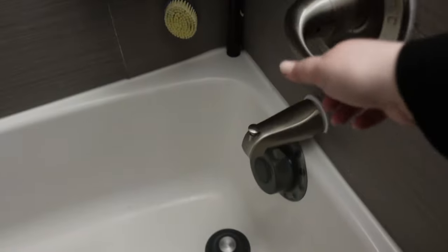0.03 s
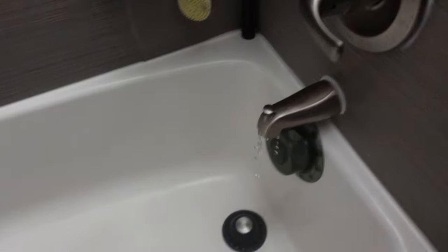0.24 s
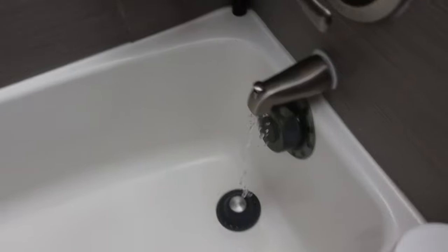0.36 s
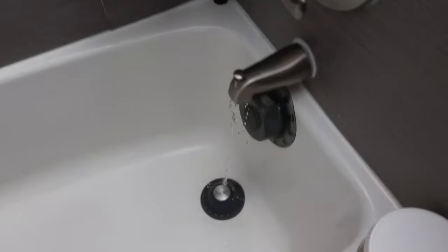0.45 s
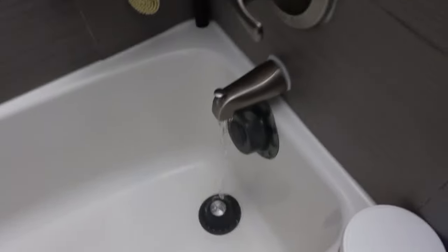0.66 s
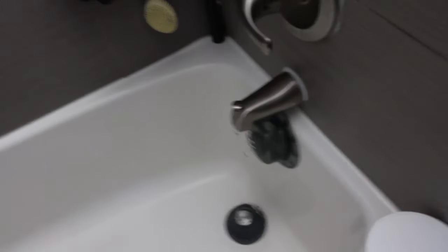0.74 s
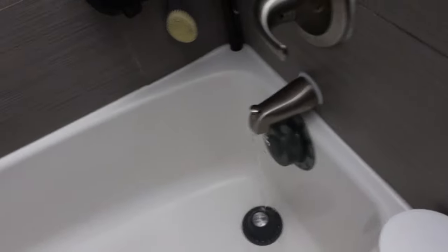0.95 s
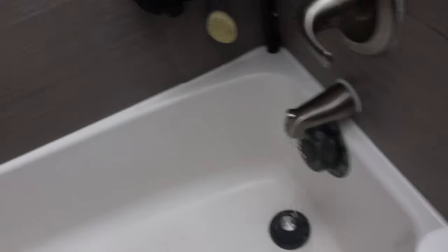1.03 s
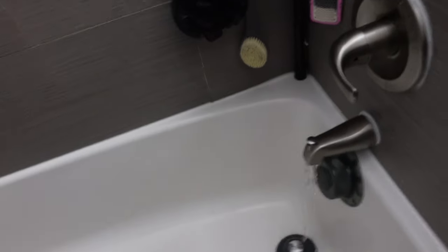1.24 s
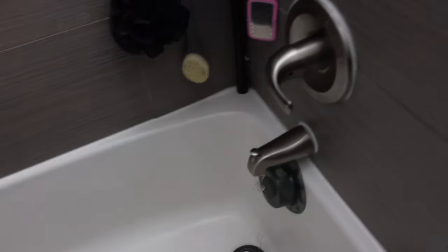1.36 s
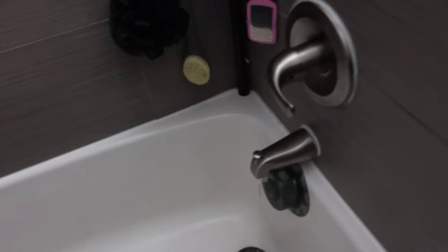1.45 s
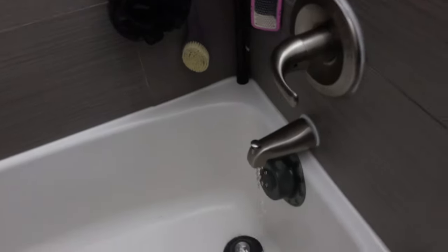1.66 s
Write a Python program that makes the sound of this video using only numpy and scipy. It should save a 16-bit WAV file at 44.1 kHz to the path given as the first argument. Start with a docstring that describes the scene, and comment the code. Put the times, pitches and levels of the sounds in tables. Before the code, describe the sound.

Water from a just-opened bath tap: faint handle clinks and pipe murmur, then a thin stream spattering on an empty tub, low handling thumps, a hard knock and sharp click; small tiled bathroom, close handheld microphone.

```python
"""Bath tap opening

A bath tap has just been opened: filtered noise murmurs in the pipe, the handle clinks as struck modes, and
a thin stream of droplet clicks, bubble pings and spray spatters on the empty tub, ringing and humming its
shell in a small tiled bathroom. The hand-held microphone sways as low noise and is bumped with low thumps.
Later come a hard knock and a sharp click close by, both shaped bursts, each with a dull jolt of low modes.
"""
import sys
import numpy as np
from scipy import signal
from scipy.fft import rfft, irfft
from scipy.io import wavfile
from scipy.ndimage import uniform_filter1d

SR = 44100
rng = np.random.default_rng(int(sys.argv[2]) if len(sys.argv) > 2 else 0)


def dump_mix(stems):
    """Bounce the given channels to the path in sys.argv[1] as a 16-bit WAV at rate SR."""
    frames = np.atleast_2d(stems).T  # one column per channel
    limited = np.clip(frames, -1, 1)  # hard clip at full scale
    pcm = np.round(limited * 32767).astype(np.int16)
    wavfile.write(sys.argv[1], SR, pcm)


N = 74970
T = np.arange(N) / SR

# All levels are relative: later gains and filters shape them further.
# Murmur of water in the pipe and spout: [f/Hz, level/dB]
PIPE_COLOUR = [(60, 4), (130, -13), (230, 3.5), (370, -3.5), (650, -2), (1000, 0), (1250, -9),
               (1550, -18.5), (2200, -17), (2900, -24.5), (4200, -22.5), (8500, -29.5), (11000, -42),
               (16000, -45)]
PIPE_DB, PIPE_WAVER_DB = -48, 1
# Gulps in the spout: [t/s, level/dB, centre f/Hz]
GULPS = [(.002, -35, 750), (0.191, -37.5, 754), (.25, -36, 740), (0.345, -34.5, 740), (0.454, -35, 1010),
         (.495, -37, 715), (0.601, -31.5, 750), (0.632, -29, 835), (0.676, -32.5, 660), (0.699, -30.5, 650),
         (0.944, -32, 970), (1.105, -30.5, 680)]
GULP_Q, GULP_DECAY_S = 2.8, 0.0067

# Sway of the microphone: [t/s, level/dB]
SWAY_LEVEL = [(0, -36), (.15, -26.5), (.24, -20.5), (.40, -24), (.62, -4), (.86, -14.5), (.97, -18),
              (1.10, -29), (1.25, -11.5), (1.45, -19.5), (1.55, -29.5), (1.7, -36)]
# Colour of the sway: [f/Hz, level/dB]
SWAY_COLOUR = [(5, -5.5), (14, -1.5), (22, -4), (35, -16), (55, -33), (90, -45), (200, -59.5), (600, -79.5)]
# Bumps on the microphone's body: [t/s, rocking level/dB, rocking f/Hz, rub level/dB]
THUMPS = [(.455, -18, 38.7, -25.5), (.478, 1, 26.1, -40), (.527, -17, 15, -28), (0.548, 0.5, 33.8, -22),
          (0.596, -5.5, 41.8, -19.5), (0.637, -2.5, 25.9, -22.5), (0.674, -7.5, 16.8, -30),
          (1.186, 2.5, 19.8, -13), (1.319, -6.5, 15.2, -20.5)]
THUMP_RISE_S, THUMP_DECAY_S, RUB_DECAY_S = 0.005, 0.06, 0.021
# Colour of the rub on the case: [f/Hz, level/dB]
RUB_COLOUR = [(20, -22.5), (65, 1), (100, -7), (200, -12.5), (300, -21.5), (600, -43.5), (2000, -84)]
RUMBLE_CEILING = 0.8  # amplitude where the handling noise saturates

# Water landing in the tub: [t/s, level/dB]
FLOW_LEVEL = [(0, -64.5), (.42, -82), (.44, -47.5), (.51, -50), (.55, -43), (.67, -38.5), (.80, -49),
              (.83, -31.5), (.90, -43), (1.0, -36), (1.09, -50), (1.18, -46), (1.30, -42), (1.45, -43.5),
              (1.485, -45.5), (1.535, -38), (1.62, -42), (1.65, -38)]
# Colour of the spatter: [f/Hz, level/dB]
SPATTER_COLOUR = [(150, -63), (400, -48), (700, 2), (1200, 5.5), (1450, -5), (1750, 1.5), (2600, -7.5),
                  (3200, -3.5), (5300, -0.5), (6800, -2.5), (8600, 2), (10500, -3), (12800, 1.5),
                  (16000, -6.5)]
DROPS_PER_S, DROP_SPREAD_DB, SPRAY_DB = 2600, 1.5, -7.5
SURGE_DB, SPATTER_DB = 4, -0.5
# Bubble pings: starting pitch range, decay in cycles, and pitch rise as a share of that pitch
PINGS_PER_S, PING_LOW_HZ, PING_HIGH_HZ = 480, 1483, 14300
PING_CYCLES, PING_RISE, PING_SPREAD_DB, PING_DB = 4.9, 0.14, 5.5, -1
# Ringing modes of the tub shell: [f/Hz, level/dB, t60/s]
TUB_MODES = [(161.8, -4.5, 0.34), (204, -4.5, 0.2), (626, -9.5, 0.6), (680, 2.5, 0.16), (815, -7, 0.27),
             (848, -7, 0.11), (961, -6, 0.39), (1020, -12.5, 0.16), (1115, 1.5, 0.2), (1213, 0.5, 0.24),
             (1281, -0.5, 0.23), (1596, 2, 0.17)]
TUB_DB = -49
TUB_SPLASH_SHARE = 0.63  # exponent: how closely the drumming follows the flow
# Low hum of the tub under the stream: [t/s, level/dB]
HUM_LEVEL = [(0, -74), (.32, -69), (.38, -52), (.62, -40.5), (.76, -55), (.84, -40), (.92, -54.5),
             (1.03, -40), (1.11, -64), (1.28, -43.5), (1.42, -54.5), (1.53, -57), (1.60, -47.5),
             (1.68, -54.5)]
HUM_HZ, HUM_WANDER_HZ = 205.6, 7.6

# Clinks of the handle: [t/s, level/dB, f/Hz, t60/s]
CLINKS = [(.038, -35.5, 1200, 0.045), (0.041, -48, 1520, 0.15), (0.052, -46.5, 2050, .07),
          (0.088, -29.5, 1036, .12), (.112, -50, 1850, 0.089)]
CLINK_ROUGH_DB, CLINK_ROOM_DB = 4, -5

# Big drops slapping the tub: [t/s, level/dB, centre f/Hz, decay/s]
SPLATS = [(.4373, -35, 2540, 0.004), (.5221, -25, 7400, 0.0016), (0.527, -33.5, 3540, 0.0044),
          (.5535, -27.5, 8500, 0.0017), (.592, -26, 7400, 0.0014), (.599, -31.5, 2900, 0.0053),
          (0.61, -39, 3600, 0.0022), (0.627, -32.5, 1800, 0.0032), (0.631, -41, 12100, 0.00071),
          (0.6594, -32.5, 6750, .003), (.666, -28, 4130, 0.003), (.71, -23.5, 4300, 0.00091),
          (.7595, -20.5, 5160, 0.0019), (.8139, -23, 6850, 0.0041), (.815, -25.5, 2220, 0.0036),
          (0.8462, -12, 4830, .0012), (.862, -26, 7050, 0.0034), (.9178, -12, 5800, 0.00089),
          (.9258, -13.5, 5430, 0.0009), (.9525, -16, 12200, 0.00081), (.9795, -32, 1890, 0.0033),
          (1.0033, -14.5, 8800, 0.00084), (1.004, -23.5, 3300, 0.0024), (1.0335, -23.5, 8500, .0007),
          (1.0595, -20, 4260, 0.00086), (1.094, -18.5, 8500, 0.00085), (1.097, -34.5, 2140, 0.0092),
          (1.11, -30.5, 5370, 0.0028), (1.1437, -34.5, 4660, 0.009), (1.4742, -28.5, 7900, 0.006),
          (1.477, -28.5, 3060, 0.0084), (1.5567, -26.5, 3700, 0.0028), (1.5922, -18, 8600, 0.00073),
          (1.6161, -20.5, 5460, .0015), (1.6236, -19.5, 7400, 0.00096)]
SPLAT_Q, SPLAT_RISE_S, SPLAT_DB = 2.9, 0.00043, -4.5
SPLAT_BREADTH_DB = -8.5  # unresonated share of each slap

# Dull jolts around the knock and the click: [t/s, level/dB]
JOLTS = [(1.178, -27.5), (1.1904, -12), (1.319, -24)]
# Low modes the jolts shake: [f/Hz, level/dB, t60/s]
JOLT_MODES = [(83, -1, 0.09), (159, -4, 0.13), (240, -2, 0.038)]

# Contacts of the hard knock: [t/s, crack level/dB, thud level/dB]
KNOCK_CONTACTS = [(1.188, -20, -35), (1.1907, -10, -14), (1.1935, -22, 11)]
# Colour of the crack: [f/Hz, level/dB]
CRACK_COLOUR = [(300, -1), (1500, 0), (3000, 0.5), (5000, -1), (7300, 1), (10500, -5), (12200, -4.5),
                (16000, -17)]
# Colour of the hollow thud: [f/Hz, level/dB]
THUD_COLOUR = [(60, 9), (160, 4.5), (300, -5), (500, 0), (700, 2), (920, 3), (1150, -1), (1500, -31.5),
               (4000, -26)]
CRACK_DECAY_S, THUD_DECAY_S, THUD_RATTLE_DB = 0.0033, 0.0042, -28
KNOCK_RING_DB, KNOCK_ROOM_DB = -3, -6.5

# Colour of the sharp click: [f/Hz, level/dB]
CLICK_COLOUR = [(300, -28), (1500, -14), (2200, -3.5), (2700, -7.5), (3500, 3), (5200, 2.5), (6600, -7.5),
                (8500, 0), (10500, -18.5), (16000, -32)]
CLICK_START_S, CLICK_DB, CLICK_ROOM_DB = 1.3187, 3.3, -0.5
CLICK_RASP_DECAY_S, CLICK_RASP_DB = 0.00099, -33.5

# First echoes from the nearest walls: [delay t/s, level/dB]
ECHOES = [(.0055, -30), (0.013, -13), (0.0195, -8)]
ROOM_T60_S, ROOM_TREBLE_T60_S, ROOM_ONSET_S = 0.22, 0.26, 0.0021
WATER_ROOM_DB = -3.5
TOP_HZ = 15800


def amp(db):
    """Turn decibels into a gain."""
    return 10 ** (np.asarray(db) / 20)


def unit(x):
    """Scale to rms 1."""
    return x / np.sqrt(np.mean(x ** 2))


def curve(points):
    """Draw a gain envelope, straight in dB, along (t/s, level/dB) points."""
    return amp(np.interp(T, *np.array(points).T))


def through(x, response):
    """Pass a sound through an impulse response."""
    return signal.fftconvolve(x, response)[:N]


def normed(response):
    """Scale a response to unit energy."""
    return response / np.sqrt(np.sum(response ** 2))


def colour(x, points):
    """Minimum-phase EQ along (f/Hz, level/dB) points that keeps the power of white noise."""
    hz, db = np.array(points).T
    f = np.maximum(np.fft.rfftfreq(N, 1 / SR), 1)
    gain = amp(np.interp(np.log(f), np.log(hz), db))
    # Folding the cepstrum makes the filter causal
    cepstrum = irfft(np.log(gain), N)
    cepstrum[1:N // 2] *= 2
    cepstrum[N // 2 + 1:] = 0
    response = irfft(np.exp(rfft(cepstrum)), N)
    return through(x, normed(response))


def resonate(x, hz, q):
    """One broad resonance that roughly keeps the power of white noise."""
    hz = min(hz, SR / 3)
    b, a = signal.iirpeak(hz, max(q, 1), fs=SR)
    return signal.lfilter(b, a, x) * np.sqrt(SR * q / (np.pi * hz))


def fade(start, decay):
    """Sudden start and exponential decay, falling to 1/e in the given seconds."""
    return (T >= start) * np.exp(-np.maximum(T - start, 0) / decay)


def tick(start):
    """A single impulse."""
    return 1. * (np.arange(N) == int(start * SR))


def burst(start, decay):
    """A dying burst of noise."""
    return fade(start, decay) * rng.choice([-1, 1], N)


def ring(start, hz, t60):
    """One struck mode: a decaying sine."""
    return fade(start, t60 / np.log(1000)) * np.sin(2 * np.pi * hz * (T - start))


def walk(rate):
    """Smooth random drift of rms 1, from noise averaged twice over 1/rate seconds."""
    width = int(SR / rate)
    smooth = uniform_filter1d(rng.standard_normal(N), width, mode="wrap")
    return unit(uniform_filter1d(smooth, width, mode="wrap"))


def bathroom(x, wet_db):
    """Direct sound, first echoes and dense tile reflections whose treble lingers slightly longer."""
    noise = rng.standard_normal(N)
    low = signal.sosfilt(signal.butter(1, 3000, fs=SR, output="sos"), noise)
    low_tail = low * fade(0, ROOM_T60_S / np.log(1000))
    treble_tail = (noise - low) * fade(0, ROOM_TREBLE_T60_S / np.log(1000))
    tail = (low_tail + treble_tail) * (1 - fade(0, ROOM_ONSET_S))
    echoes = sum(amp(db) * tick(delay) for delay, db in ECHOES)
    return x + amp(wet_db) * through(x, normed(normed(tail) + echoes))


def tub(x):
    """The shell's modes ring with whatever strikes it."""
    modes = sum(amp(db) * ring(0, hz, t60) for hz, db, t60 in TUB_MODES)
    return through(x, normed(modes))


def spout():
    """Water murmurs in the pipe and gulps as it pushes the air out."""
    rush = rng.standard_normal(N) * amp(PIPE_WAVER_DB * walk(60))
    murmur = amp(PIPE_DB) * colour(rush, PIPE_COLOUR)
    gulps = sum(amp(db) * resonate(burst(start, GULP_DECAY_S), hz, GULP_Q) for start, db, hz in GULPS)
    gulps = signal.sosfilt(signal.butter(6, 1300, fs=SR, output="sos"), gulps)
    return murmur + bathroom(gulps, wet_db=-0.5)


def handling():
    """The microphone sways; each bump rocks it briefly, softly saturating, and rubs its case."""
    sway = unit(colour(rng.standard_normal(N), SWAY_COLOUR)) * curve(SWAY_LEVEL)
    rock = 0
    for start, db, hz, _ in THUMPS:
        swing = ring(start, hz, THUMP_DECAY_S * np.log(1000))
        rock = rock + amp(db) * swing * (1 - fade(start, THUMP_RISE_S))
    rubs = sum(amp(rub_db) * burst(start, RUB_DECAY_S) for start, _, _, rub_db in THUMPS)
    rumble = sway - rock + colour(rubs, RUB_COLOUR)
    return RUMBLE_CEILING * np.tanh(rumble / RUMBLE_CEILING)


def pings():
    """Droplets ping tiny air bubbles, each a rising tone that dies within a few cycles."""
    out = np.zeros(N)
    for when, pitch, size in rng.random((int(PINGS_PER_S * N / SR), 3)):
        start = int(when * N)
        hz = PING_LOW_HZ * (PING_HIGH_HZ / PING_LOW_HZ) ** np.sqrt(pitch)  # favours high pitches
        cycles = T[:min(N - start, SR // 50)] * hz
        decay = np.exp(-cycles / PING_CYCLES)
        gain = amp(PING_SPREAD_DB * min(-np.log(1 - size), 3.5))
        tone = np.sin(2 * np.pi * cycles * (1 + PING_RISE * (1 - decay)))
        out[start:start + len(cycles)] += gain * decay * tone
    return unit(out)


def stream():
    """Dense droplets, bubble pings and a fine spray arrive in surges; droplets and spray drum on the tub."""
    falls = rng.random(N) < DROPS_PER_S / SR
    size = amp(DROP_SPREAD_DB * np.minimum(rng.exponential(size=N), 4))
    droplets = unit(falls * size * rng.choice([-1, 1], N))
    drops = droplets + amp(SPRAY_DB) * rng.standard_normal(N)
    surge = amp(SURGE_DB * walk(66))
    flow = curve(FLOW_LEVEL)
    drumming = amp(TUB_DB) * tub(unit(drops) * unit(flow) ** TUB_SPLASH_SHARE)
    water = unit((drops + amp(PING_DB) * pings()) * surge)
    spatter = bathroom(colour(water * flow, SPATTER_COLOUR), WATER_ROOM_DB)
    return drumming + spatter * amp(SPATTER_DB) / np.sqrt(2)


def hum():
    """The stream keeps a low mode of the tub humming at a wandering pitch and level."""
    hz = HUM_HZ + HUM_WANDER_HZ * walk(56.7)
    tone = np.sin(2 * np.pi * np.cumsum(hz) / SR)
    return curve(HUM_LEVEL) * unit(tone * amp(2.44 * walk(17)))


def handle():
    """Faint, rattling metal clinks, struck modes of uneven level, as the handle comes to rest."""
    clinks = 0
    for start, db, hz, t60 in CLINKS:
        rattle = unit(amp(CLINK_ROUGH_DB * walk(300)))
        clinks = clinks + amp(db) * ring(start, hz, t60) * rattle
    return bathroom(clinks, CLINK_ROOM_DB)


def splats():
    """Each big drop is a short noise crack with its own resonance."""
    out = 0
    for start, db, hz, decay in SPLATS:
        slap = burst(start, decay) * (1 - fade(start, SPLAT_RISE_S))
        out = out + amp(db) * (resonate(slap, hz, SPLAT_Q) + amp(SPLAT_BREADTH_DB) * slap)
    return amp(SPLAT_DB) * bathroom(colour(out, SPATTER_COLOUR), WATER_ROOM_DB)


def jolts():
    """Short, low thuds come with the two hard hits, each shaking the same low modes."""
    out = 0
    for start, db in JOLTS:
        for hz, mode_db, t60 in JOLT_MODES:
            out = out + amp(db + mode_db) * ring(start, hz, t60)
    return out


def knock():
    """Three contacts within a few milliseconds: a bright crack over a hollow thud, and the tub rings on."""
    cracks = sum(amp(db) * burst(start, CRACK_DECAY_S) for start, db, _ in KNOCK_CONTACTS)
    blows = 0
    for start, _, db in KNOCK_CONTACTS:
        rattle = amp(THUD_RATTLE_DB) * burst(start, THUD_DECAY_S)
        blows = blows + amp(db) * (tick(start) + rattle)
    thud = bathroom(colour(blows, THUD_COLOUR), wet_db=-11)
    crack = bathroom(colour(cracks, CRACK_COLOUR), KNOCK_ROOM_DB)
    shell = amp(KNOCK_RING_DB) * tub(tick(KNOCK_CONTACTS[-1][0]))
    return crack + thud + shell


def click():
    """One sharp snap, an impulse with a brief noise rasp, that lights up the room."""
    rasp = amp(CLICK_RASP_DB) * burst(CLICK_START_S, CLICK_RASP_DECAY_S)
    snap = amp(CLICK_DB) * (tick(CLICK_START_S) + rasp)
    return bathroom(colour(snap, CLICK_COLOUR), CLICK_ROOM_DB)


def scene():
    """Everything at one microphone, as a single channel."""
    water = stream() + hum() + splats() + spout()
    hits = handle() + knock() + click() + jolts()
    return (water + hits + handling())[None]


def record(dry):
    """The recorder cuts the top with a steep low-pass."""
    return signal.sosfilt(signal.ellip(10, .2, 80, TOP_HZ, fs=SR, output="sos"), dry)


dry = scene()
out = record(dry)
dump_mix(out)
```